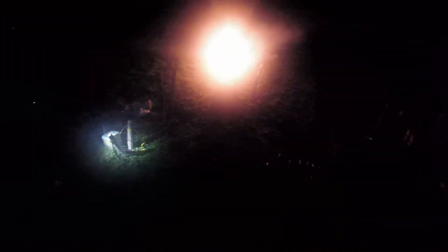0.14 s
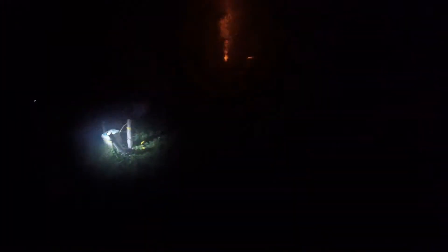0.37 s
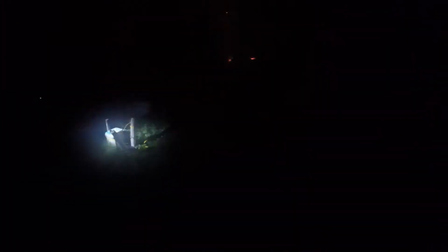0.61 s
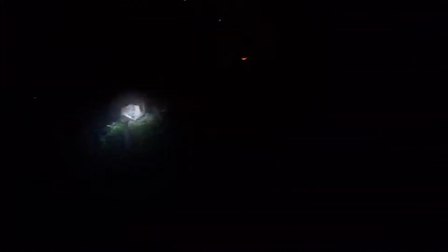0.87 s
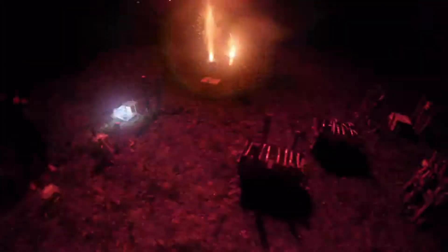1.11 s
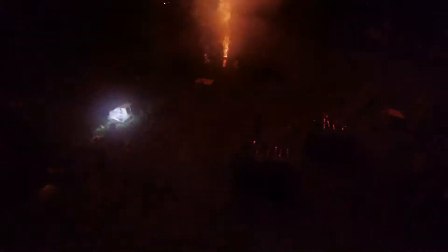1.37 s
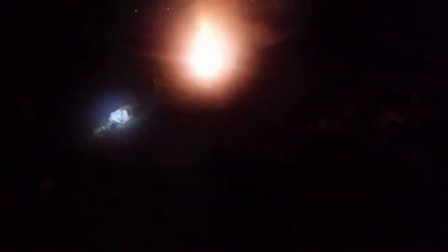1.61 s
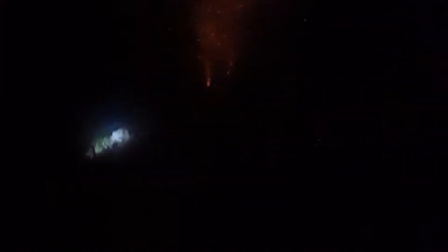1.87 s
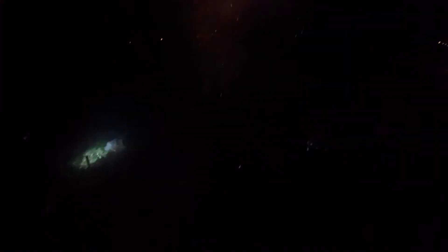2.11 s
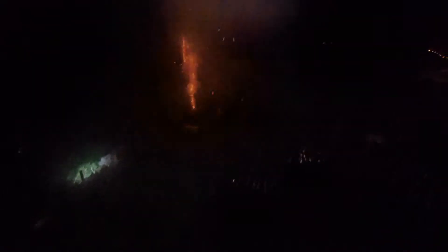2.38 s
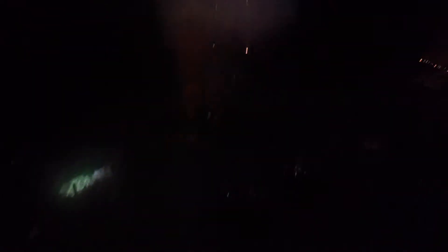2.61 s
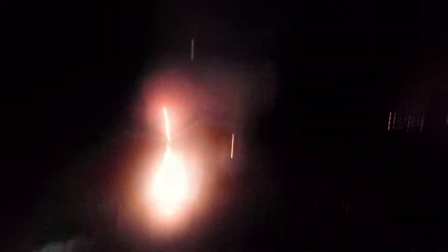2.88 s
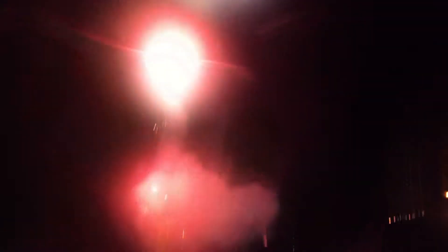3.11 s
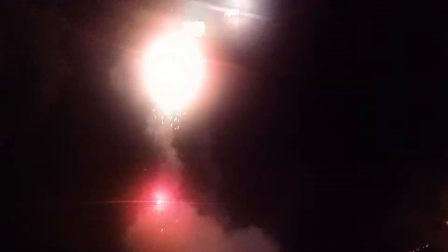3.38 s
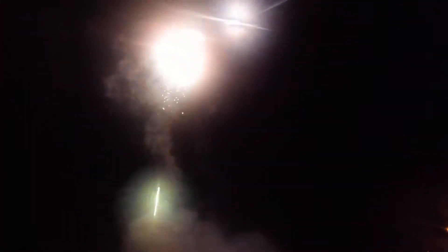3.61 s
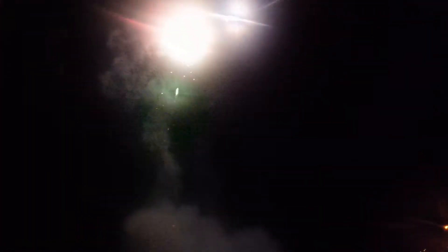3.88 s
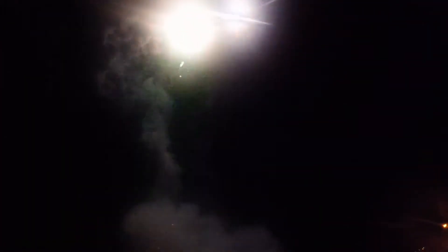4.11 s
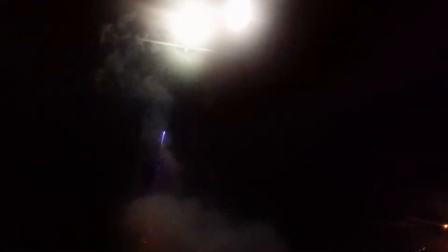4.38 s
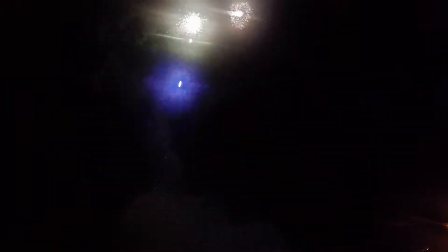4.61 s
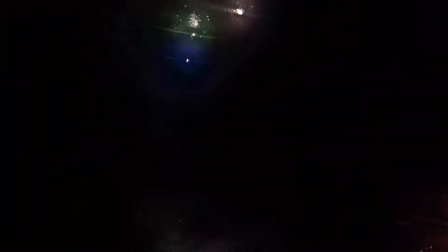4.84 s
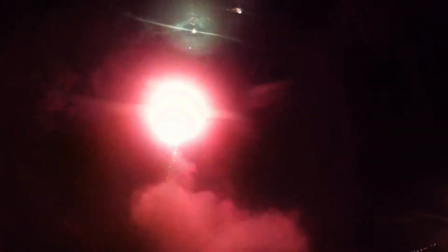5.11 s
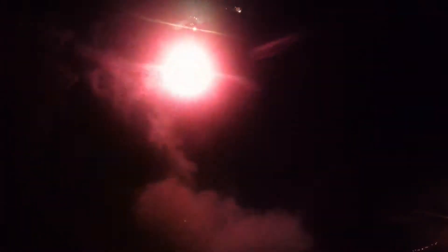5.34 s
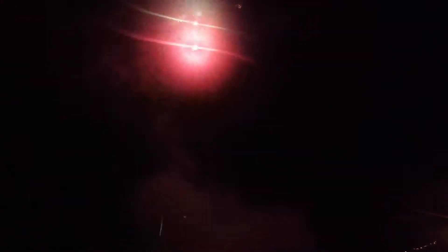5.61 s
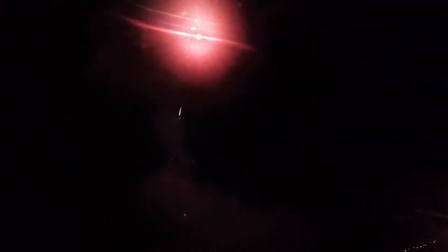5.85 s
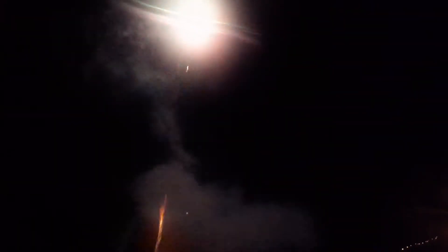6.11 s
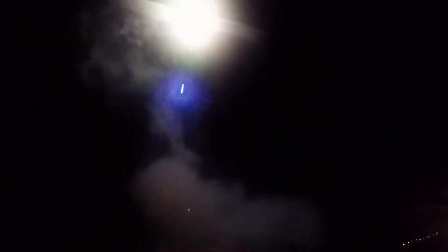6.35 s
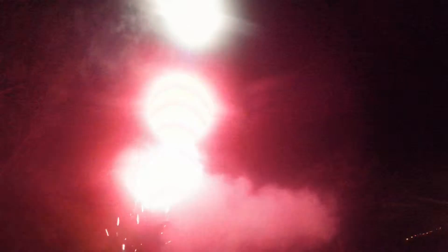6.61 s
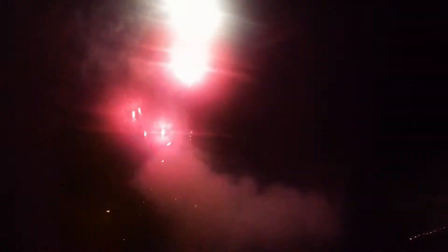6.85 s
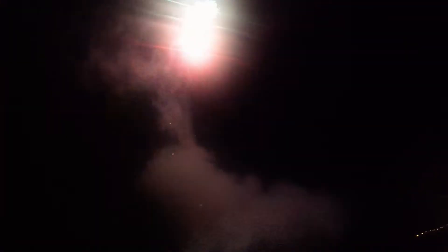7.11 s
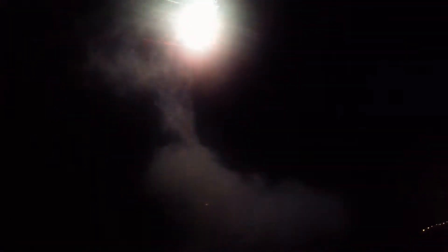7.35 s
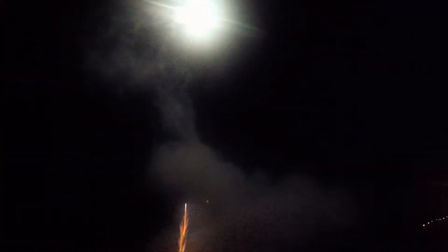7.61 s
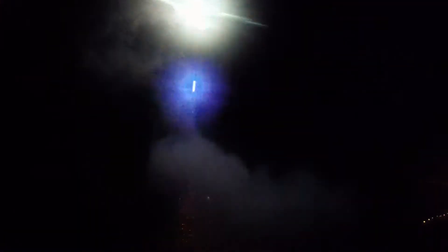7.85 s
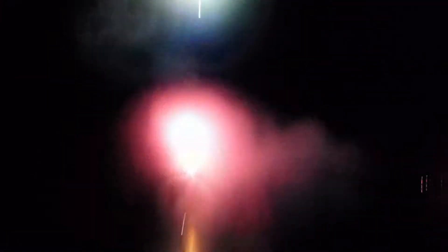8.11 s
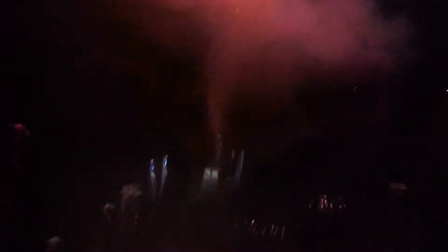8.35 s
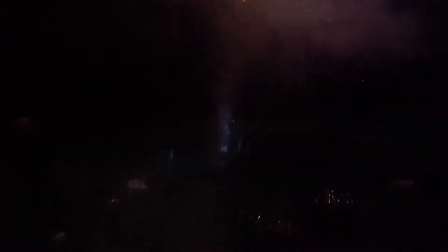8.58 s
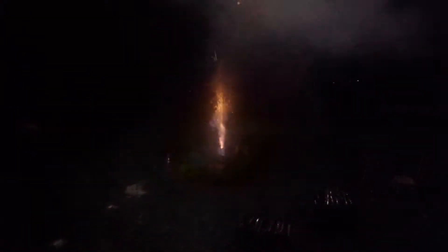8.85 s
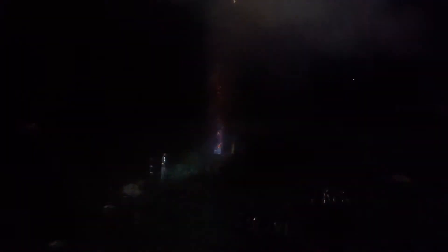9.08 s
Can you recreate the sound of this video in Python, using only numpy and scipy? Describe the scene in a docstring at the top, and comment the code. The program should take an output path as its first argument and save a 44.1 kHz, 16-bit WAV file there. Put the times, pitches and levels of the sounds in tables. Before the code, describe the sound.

Sharp lift-charge cracks start after a quiet moment, bunch into a rapid cluster just after one second, then continue roughly every half second with fuller low thumps. Each rings out over an open field in short rough echoes. Spitting hiss and sizzle swell and fade between shots, over faint air and far rumbling. The close, small microphone is resonant and squeezed by the loud peaks.

```python
"""Fireworks are fired from tubes in a field at night: from the start each lift charge bangs as a jump of pressure
and puffs of noise, nearby walls and a far tree line throw it back, and burning stars hiss and spit.
Just after 1.1 seconds a brief spray of small pops crackles; then three big shells boom deeply, far booms rumble,
near six seconds a faint tone rises, and past eight air buffets the microphone. Still night air lies under it all.
A small camera hears this: its housing rings at a few resonances and its limiter ducks under strong peaks."""
import sys
import numpy as np
from scipy import signal
from scipy.fft import rfft, irfft
from scipy.io import wavfile
from scipy.ndimage import uniform_filter1d, map_coordinates

SR = 44100
rng = np.random.default_rng(int(sys.argv[2]) if len(sys.argv) > 2 else 0)


def log_audio(samples):
    """Write samples as a 16-bit WAV file to the path given in sys.argv[1]."""
    # one column per channel
    frames = np.atleast_2d(samples).T
    # limit to full scale, then quantise
    limited = np.clip(frames, -1, 1)
    pcm = np.round(limited * 32767).astype(np.int16)
    wavfile.write(sys.argv[1], SR, pcm)


def ratio_of_db(decibels):
    """Turn decibels (scalar or array-like) into linear amplitude factors; 0 dB maps to 1."""
    return 10 ** (np.asarray(decibels, float) / 20)


N = 406602  # length in samples

# Single reflections that follow every shot and big shell.
# Each row: delay in seconds, bang in dB over the shot's echo level, thump in dB.
REFLECTIONS = [(0.0394, -8.5, -19.5), (0.086, -15, -19), (.125, -43, -27.5), (0.157, -53, -37),
               (.185, -56, -39), (0.426, -45, -22)]


def along(points, hz):
    """Reads a curve of (Hz, value) points on a logarithmic frequency axis."""
    f, v = np.transpose(points)
    return np.interp(np.log(hz + 1), np.log(f + 1), v)


def wobble(rate):
    """A smooth random curve with the given number of random knots a second."""
    knots = rng.standard_normal(int(N * rate / SR) + 4)
    return map_coordinates(knots, [np.arange(N) * rate / SR])


def swells(starts, holds, levels_db, rise, fall):
    """Gain of sounds that rise, hold and fall at set dB per second; their powers add."""
    t, power = np.arange(N) / SR, np.zeros(N)
    for s, hold, db in zip(starts, holds, levels_db):
        before, after = np.maximum(s - t, 0), np.maximum(t - s - hold, 0)
        power += ratio_of_db(db - rise * before - fall * after) ** 2
    return np.sqrt(power)


def coloured(x, gain_db):
    """Filters with the given dB gain over frequency, without sounding ahead of time (minimum phase)."""
    size = 1 << 14
    cepstrum = irfft(np.log(ratio_of_db(gain_db(np.fft.rfftfreq(size, 1 / SR)))))
    # Folding the cepstrum onto positive times makes the filter causal.
    cepstrum[1:size // 2] *= 2
    cepstrum[size // 2 + 1:] = 0
    response = irfft(np.exp(rfft(cepstrum)))[:size // 2]
    return signal.fftconvolve(x, response)[:len(x)]


def camera(x):
    """The microphone behind its port: a broad response with the peaks and dips of the ringing housing."""
    # The broad response. Each row: frequency in Hz, gain in dB.
    broad = [(20, -23), (60, -6), (110, -1), (330, -5), (450, -15.5), (950, -21.5), (1400, -12.5),
             (1850, -13), (3200, -11.5), (4100, -13.5), (4500, -21.5), (5600, -17), (8000, -17),
             (9000, -24), (12000, -37.5), (16000, -47)]
    # Housing resonances. Each row: centre in Hz, width in Hz at half the dB, dB over the broad response.
    resonances = [(370, 70, 5), (1360, 60, -5), (1535, 170, 9), (1810, 100, -4), (2105, 100, 9),
                  (2915, 80, 4), (3485, 120, 5), (3710, 70, -11), (3930, 200, 7), (5600, 400, -4),
                  (6260, 320, 6), (13300, 2000, 6), (2400, 110, 3), (2630, 100, 4), (4620, 140, 2),
                  (10100, 450, 4)]

    def gain_db(hz):
        bumps = sum(db / (1 + (2 * (hz - centre) / width) ** 2) for centre, width, db in resonances)
        return along(broad, hz) + bumps

    return coloured(x, gain_db)


def noise(spectrum, patchy_db, spit=0):
    """Noise with uneven patches in time and pitch and spitting grains, at rms 1 after the camera's colour."""
    grains = (rng.random(N) < 250 / SR) * rng.standard_normal(N)  # about 250 a second
    z = signal.stft(rng.standard_normal(N) + spit * grains, nperseg=256)[2]
    patches = uniform_filter1d(rng.standard_normal(z.shape), 6, 0)
    patches = uniform_filter1d(patches, 14, 1)
    x = signal.istft(z * ratio_of_db(patchy_db * patches / patches.std()), nperseg=256)[1][:N]
    x = coloured(x, lambda hz: along(spectrum, hz))
    return x / camera(x).std()


def push(t, length):
    """A pressure jump and the suction after it, energy 1."""
    wave = -(1 - t / length) * np.exp(-t / length)
    return wave / np.linalg.norm(wave)


def burst(t, length, low_hz, high_hz):
    """Turbulent gas: a fading puff of noise in a band, energy 1."""
    def band_db(hz):
        below = np.clip(24 * np.log2(low_hz / (hz + 1)), 0, 60)  # 24 dB an octave
        above = np.clip(18 * np.log2((hz + 1) / high_hz), 0, 60)  # 18 dB an octave
        return -below - above

    wave = coloured(rng.standard_normal(len(t)) * np.exp(-(t / length) ** 2), band_db)
    return wave / np.linalg.norm(wave)


def charge(t, thump, thump_db, crack_db):
    """One lift charge: sharp snap, slower gas, low-mid body, deep thump and bright crack."""
    # Sharp charges, those with more crack, snap louder and brighter.
    edge_hz = 1820 * ratio_of_db(0.34 * crack_db)
    snap_gas = ratio_of_db(-11 + 0.48 * crack_db) * burst(t, 0.0043, low_hz=2095, high_hz=edge_hz)
    snap = 0.4 * push(t, 0.0002) + snap_gas
    # Deep charges blow longer; this slower gas roars lower.
    blow_s = 0.0061 + 0.0001 * thump_db
    bang = snap + burst(t, blow_s, low_hz=1300, high_hz=1770)
    bang /= np.abs(camera(bang)).max()
    # The body follows part of the thump's dB.
    body = ratio_of_db(10 + 0.36 * thump_db) * burst(t, 0.0073, low_hz=458, high_hz=1130)
    crack = ratio_of_db(crack_db) * burst(t, 0.0039, low_hz=5160, high_hz=14000)
    return bang + body + thump + crack


def scatter(gap, gap_db):
    """The ground answers weakly, then trees and fences join; each frequency dies at its own speed. Energy 1."""
    # How fast the answer dies. Each row: frequency in Hz, time to fall by 60 dB in seconds.
    decay = [(80, 1.0), (300, 0.58), (1500, 0.64), (4000, 0.68), (9000, 0.33)]
    # Tone at the start of the answer. Each row: frequency in Hz, level in dB.
    tone = [(30, -17.5), (100, -21), (350, -1.5), (700, -5), (1500, -1.5), (2500, 0.5), (4000, -5),
            (8000, 2.5), (15000, 6)]
    sizes = np.repeat(rng.standard_normal(SR // 64 + 1), 64)[:SR]
    reflectors = ratio_of_db(2.5 * sizes)  # uneven sizes make it grainy
    hz, t, z = signal.stft(reflectors * rng.standard_normal(SR), SR, nperseg=256)
    fade_db = along(tone, hz)[:, None] - 60 * t / along(decay, hz)[:, None]
    tail = signal.istft(z * ratio_of_db(fade_db), SR, nperseg=256)[1]
    # The answer stays weak during the gap, then opens up.
    times = [0, gap - 0.012, gap - 0.003, gap + 0.0023]
    opening_db = np.interp(np.arange(len(tail)) / SR, times, [gap_db, gap_db, gap_db / 2, 0])
    tail *= ratio_of_db(opening_db)
    return tail / np.linalg.norm(tail)


def shots():
    """Each charge sounds directly, then by its single reflections and the field's long scattered answer."""
    # Lift charges and bursts. Each row: start in seconds, bang level in dB (its peak after the camera's
    # colour), then thump, crack and echo levels in dB over the bang level.
    charges = [(0.2132, -1, 5, 20, 16.5), (1.0586, 4, -.5, 20, 13.5), (1.122, -7.5, -8.5, 27, 18),
               (1.1546, -9.5, -10, 17.5, 21.5), (1.262, -1, 8.5, 25.5, 8), (1.6132, -5.5, -0.5, 18, 16.5),
               (2.281, -3, 6, 24, 17.5), (2.9179, 0, 7, 24, 18.5), (3.585, -4.5, 16, 19, 23.5),
               (4.2355, 1, 15, 19, 20), (4.579, -4.5, 7, 21, 17), (4.5882, -11.5, 16, 20.5, 19.5),
               (4.8918, -13, 15, 17.5, 21.5), (5.588, -4, 16, 11, 20.5), (6.1087, 1, 14.5, 18, 19),
               (6.463, 0.5, 13.5, 15, 19.5), (7.1672, -6.5, 23, 15, 23.5), (7.6218, -0.5, 13.5, 13, 18.5),
               (8.0998, -0.5, 13, 11.5, 19), (8.1709, -17, -4.5, 15, 23.5), (8.7624, -1, 3, 22, 15)]
    out, t = np.zeros(N + 2 * SR), np.arange(2048) / SR
    for s, db, thump_db, crack_db, echo_db in charges:
        at = round(s * SR)
        thump = ratio_of_db(thump_db) * push(t, 0.00052)
        out[at:][:len(t)] += ratio_of_db(db) * charge(t, thump, thump_db, crack_db)
        # Distance dulls the thump above 400 Hz.
        rounded = coloured(thump, lambda hz: -np.clip(30 * np.log2((hz + 1) / 400), 0, 70))
        for delay, far_db, low_db in REFLECTIONS:
            size_db = rng.normal(0, 1.5)
            smeared = 0.2 * push(t, 0.0001) + burst(t, 0.012, low_hz=1750, high_hz=3180)
            smeared *= ratio_of_db(echo_db + far_db + size_db)
            reflection = smeared + ratio_of_db(low_db) * rounded
            out[at + round(delay * SR):][:len(t)] += ratio_of_db(db) * reflection
        source = ratio_of_db(echo_db) * push(t, 0.0001) + ratio_of_db(-13.5) * thump
        tail = signal.fftconvolve(scatter(gap=0.045, gap_db=-9.5), source)
        out[at:][:len(tail)] += ratio_of_db(db) * tail
    return out[:N]


def shells():
    """A big burst is a deep, quickly damped swing of the air with a gusty blast; the same walls throw it back."""
    # Big shells bursting overhead. Each row: start in seconds, level in dB.
    big_bursts = [(1.264, -19.5), (4.579, -11), (4.89, -24.5)]
    paths = [(0, 0)] + [(delay, low_db + 1.5) for delay, _, low_db in REFLECTIONS]
    out, t = np.zeros(N + SR), np.arange(SR // 5) / SR
    for s, db in big_bursts:
        swing = np.sin(2 * np.pi * 108 * t) * np.exp(-t / 0.011)
        boom = swing + ratio_of_db(29) * burst(t, 0.013, low_hz=420, high_hz=1100)
        for delay, path_db in paths:
            out[round((s + delay) * SR):][:len(t)] += ratio_of_db(db + path_db) * boom
    return out[:N]


def stars():
    """Fuses and stars burn as sputtering noise: a broad hiss and a sizzle, weaker for far ones."""
    # Each row: time of full level in seconds, hold in seconds, hiss in dB, sizzle in dB over the hiss.
    burns = [(.4, .22, -58.5, -5.5), (.85, .02, -53, -10), (0.966, 0.083, -44, -12),
             (1.3, 0.075, -38.5, -8.5), (2.172, 0.028, -46, -14), (2.399, .03, -43, -8.5),
             (2.554, .08, -41, -8), (2.717, 0.094, -42.5, -5.5), (3.197, 0.073, -49.5, -11),
             (3.33, 0.049, -43.5, -8.5), (3.41, 0.018, -42, -5.5), (3.509, .07, -40, -4.5),
             (3.662, .34, -36, -7), (4.189, 0.31, -45, -5), (4.76, .11, -41, -13.5),
             (4.953, 0.19, -45, -17.5), (5.197, .38, -47.5, -22), (6.03, 0.048, -55.5, -14),
             (6.409, .06, -44, -12.5), (6.649, 0.034, -39.5, -8), (6.773, .1, -39.5, -9.5),
             (7.03, 0.31, -41.5, -7), (7.47, 0.15, -42.5, -5.5), (7.697, .14, -38, -7),
             (7.97, .12, -46, -14), (8.2, 0.045, -38, -8), (8.315, .09, -35.5, -8.5),
             (8.62, 0.083, -45, -8.5), (8.88, .3, -45.5, -11)]
    # Tone of the hiss. Each row: frequency in Hz, level in dB.
    hiss_tone = [(30, -16), (150, -21), (400, -10), (900, 0.5), (2000, 7.5), (4000, 3), (6000, -23),
                 (9000, -36)]
    # Tone of the sizzle. Each row: frequency in Hz, level in dB.
    sizzle_tone = [(2500, -22.5), (4500, 3), (6000, -2.5), (8000, -5), (11000, -4.5), (15000, -3)]
    s, hold, db, sizzle_db = np.transpose(burns)
    sputter = ratio_of_db(1.1 * wobble(20) + 0.7 * wobble(60))
    # Stars light up and burn out at 115 dB a second, over faint burning that never stops.
    hiss = np.hypot(ratio_of_db(-56.5), swells(s, hold, db, rise=115, fall=115))
    sizzle = np.hypot(ratio_of_db(-70.5), swells(s, hold, db + sizzle_db, rise=115, fall=115))
    burning = hiss * noise(hiss_tone, patchy_db=1.2, spit=5)
    burning += sizzle * noise(sizzle_tone, patchy_db=1.8, spit=6)
    return sputter * burning


def crackle():
    """Ragged sprays of small pops: very patchy, spitting noise that swells and fades fast."""
    # Each row: time of full level in seconds, hold in seconds, level in dB.
    sprays = [(1.123, .004, -27), (1.135, .002, -20.5), (1.148, .01, -21.5)]
    # Tone of the pops. Each row: frequency in Hz, level in dB.
    pop_tone = [(300, -24), (700, 5), (1100, 13), (1600, -9), (4000, 0.5), (6000, -14), (12000, -20)]
    level = swells(*np.transpose(sprays), rise=2500, fall=1250)
    return level * noise(pop_tone, patchy_db=4, spit=11)


def buffets():
    """Slow lumps of air against the microphone port, each a smooth push one way and then the other."""
    # Each row: middle in seconds, gain in dB, length in seconds.
    lumps = [(8.341, -7.5, 0.024), (8.382, -12.5, 0.023), (8.425, -29.5, .015)]
    t, out = np.arange(N) / SR, np.zeros(N)
    for s, db, length in lumps:
        u = (t - s) / length
        out += ratio_of_db(db) * u * np.exp(-(2 * u) ** 2)
    return out


def distant_booms():
    """Far booms roll in and out as low, wavering noise, with a faint rumble between them."""
    # Each row: time of full level in seconds, hold in seconds, level in dB.
    rolling = [(1.295, 0.045, -44.5), (2.898, 0.47, -55), (4.651, .15, -44), (4.95, 0.11, -45.5),
               (5.25, 0.31, -47.5), (5.9, 1, -55.5), (8.2, .1, -51)]
    # Tone of the booms. Each row: frequency in Hz, level in dB.
    boom_tone = [(20, 7), (50, -6), (110, -3.5), (200, -14.5), (400, -17), (700, -5.5), (1200, -11.5),
                 (2500, -54)]
    rolls = np.hypot(ratio_of_db(-65), swells(*np.transpose(rolling), rise=90, fall=47))
    return rolls * ratio_of_db(1.5 * wobble(15)) * noise(boom_tone, patchy_db=0.5)


def whistle():
    """One faint whistle: a sine with a rising, slightly unsteady pitch and a wavering level."""
    start_s, hold_s = 5.84, 0.19
    since = np.clip(np.arange(N) / SR - start_s, -hold_s, hold_s)
    level = swells([start_s], [hold_s], [-44], rise=700, fall=700) * ratio_of_db(3 * wobble(40))
    pitch_hz = 1030 + 400 * since + 12 * wobble(60)  # climbs 400 Hz a second
    return level * np.sin(2 * np.pi * np.cumsum(pitch_hz) / SR)


def night_air():
    """Still night air: a steady, slightly patchy noise bed."""
    # Tone of the air. Each row: frequency in Hz, level in dB.
    air_tone = [(20, 28.5), (60, -2), (300, -2.5), (700, 8), (1500, 4), (4000, -12), (8000, -19),
                (11000, -15), (15000, -27)]
    return ratio_of_db(-55.5) * noise(air_tone, patchy_db=0.8)


def scene():
    """Everything reaches one microphone."""
    fireworks = shots() + shells() + stars() + crackle()
    background = buffets() + distant_booms() + whistle() + night_air()
    return (fireworks + background)[None]


def limiter(x, top_db, release):
    """Gain drops at once under a peak and climbs back exponentially in dB, with release in seconds."""
    cut_db = np.maximum(20 * np.log10(np.abs(x) + 1e-9) - top_db, 0)
    # A running maximum on a rising ramp keeps each cut and lets it die away.
    climb = np.arange(len(x)) / (release * SR)
    held_db = np.exp(np.maximum.accumulate(np.log(cut_db + 1e-9) + climb) - climb)
    return x * ratio_of_db(-held_db)


def top_cut(x):
    """Nothing passes above the cut-off."""
    return signal.sosfilt(signal.butter(12, 16510, fs=SR, output="sos"), x)


def record(dry):
    """Housing colour, then the limiter, then the converter's steep top edge."""
    limited = limiter(camera(dry[0]), top_db=-0.8, release=0.012)
    # Above 14300 Hz the level falls 1 dB every 75 Hz, down to -60 dB.
    mix = coloured(limited, lambda hz: -np.clip((hz - 14300) / 75, 0, 60))
    return top_cut(mix[None])


dry = scene()
out = record(dry)
log_audio(out)
```